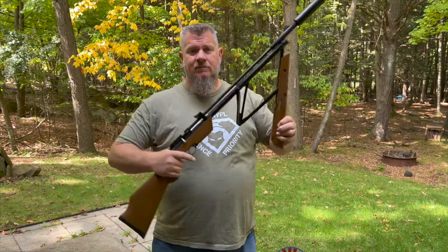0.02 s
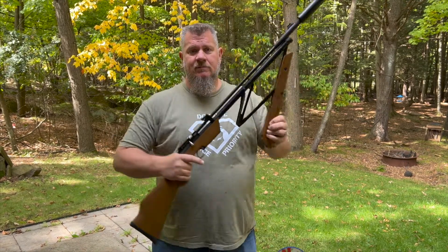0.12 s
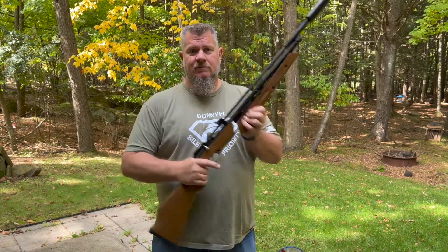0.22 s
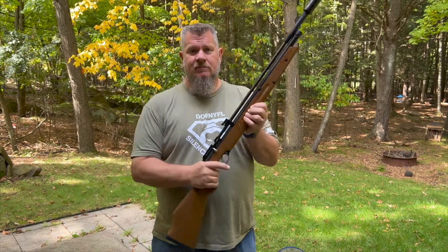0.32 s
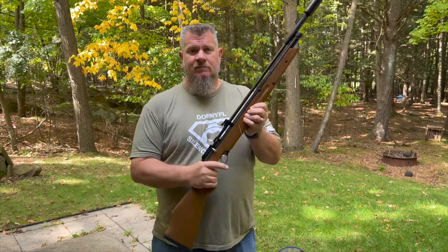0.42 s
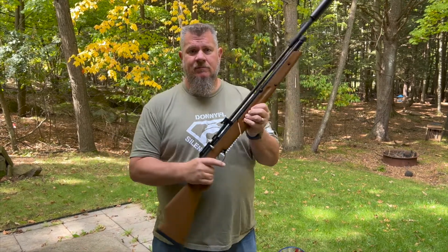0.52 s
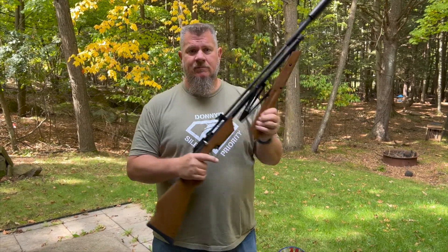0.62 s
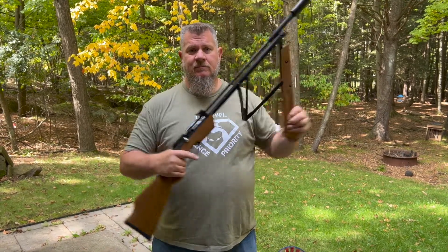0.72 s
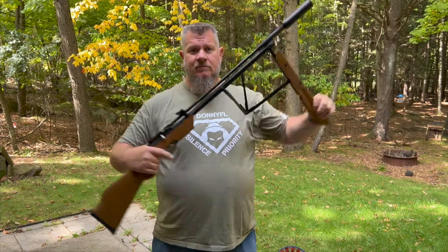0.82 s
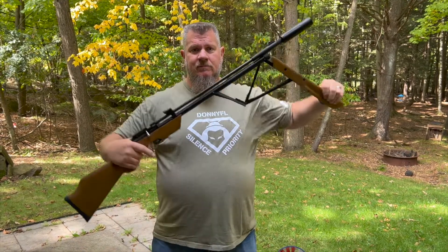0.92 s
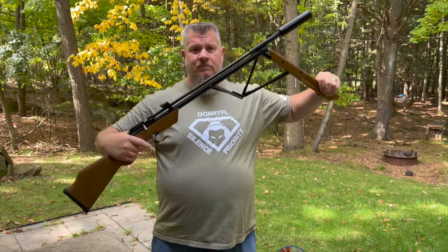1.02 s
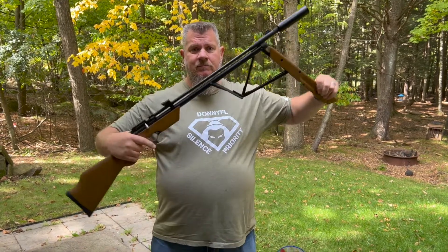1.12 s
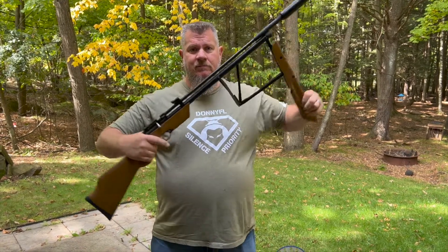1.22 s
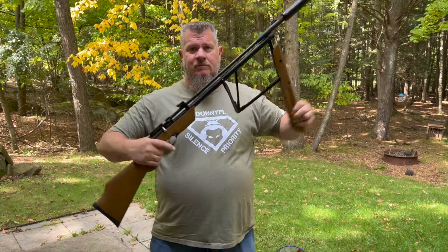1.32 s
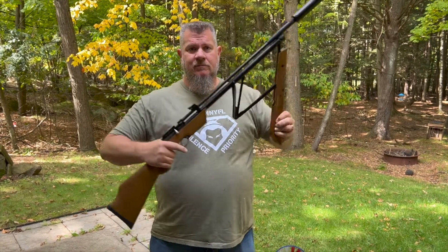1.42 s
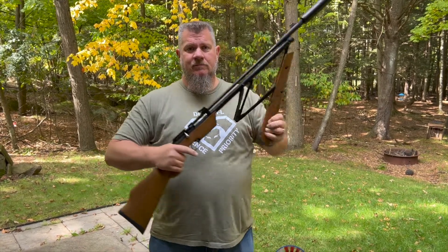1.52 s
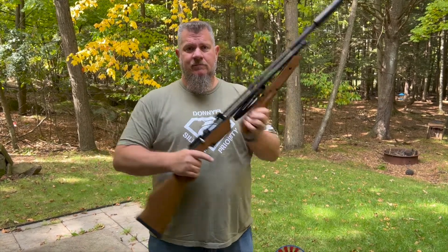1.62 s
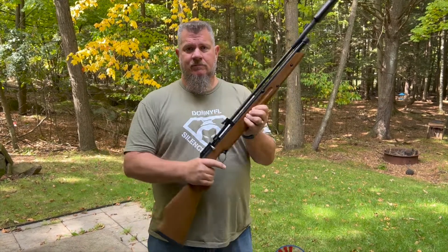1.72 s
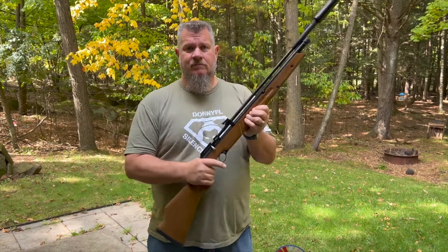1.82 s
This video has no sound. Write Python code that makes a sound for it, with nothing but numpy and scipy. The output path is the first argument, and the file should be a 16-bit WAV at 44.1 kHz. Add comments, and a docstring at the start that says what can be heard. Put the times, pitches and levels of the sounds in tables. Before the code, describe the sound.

An air rifle's pump lever snaps shut with a steel crack and wooden clap, clacks open in several metallic knocks, then slams shut again; short echoes from ground and trees, quiet outdoor air, loudest hits slightly overloading the microphone.

```python
"""In a garden at the edge of a wood, the pump lever of an air rifle is shut, swung open and shut again.
Shutting is a bright steel snap, then the wooden forearm claps home; opening makes the steel linkage clack.
Each blow is a short crack of fading noise plus ringing tones; clouds of tiny echoes from ground and trees follow.
Filtered noise makes the outdoor air, soft low handling thumps and pump hiss; a falling tone, a faint whistle.
The loudest blows overload the microphone."""
import sys
import numpy as np
from scipy import signal
from scipy.fft import rfft, irfft, next_fast_len
from scipy.io import wavfile

SR = 44100
rng = np.random.default_rng(int(sys.argv[2]) if len(sys.argv) > 2 else 0)


def store_wav(level_fs):
    """Save 16-bit WAV to argv[1]."""
    pcm = np.round(np.clip(np.atleast_2d(level_fs), -1, 1) * 32767)
    wavfile.write(sys.argv[1], SR, pcm.T.astype(np.int16))


N = 83790  # length in samples, 1.9 s

# phase lead of the left channel over the right: (pitch_hz, lead_radians)
LEFT_LEAD = [(100, -0.5), (700, 0.9), (2600, 0.42), (4800, 1), (5800, 2.5), (6700, -0.14), (8000, 1.5),
             (9100, -3.5), (10900, -2.5), (12200, -6), (14000, -5.5), (15800, -7)]
# how much of a crack or hiss differs between the channels: (pitch_hz, share from 0 to 1)
DIRECT_SPREAD = [(200, .15), (1500, .24), (4000, 0.44), (7500, 0.74), (10000, 0.21), (15000, .25)]
AIR_SPREAD = 0.33  # the same share, for the outdoor air, the thumps and the whistle


def undb(db):
    """Turn decibels into a plain loudness factor."""
    return 10 ** (np.asarray(db) / 20)


def unit(x):
    """Scale to an average (rms) level of 1."""
    return x / np.sqrt(np.mean(x ** 2))


def freqs(size):
    """List the frequencies of a spectrum in Hz, with zero raised to 1 so that logarithms work."""
    return np.maximum(np.fft.rfftfreq(size, 1 / SR), 1)


def along(points, hz):
    """Read a curve of (pitch_hz, value) points, joined by straight lines on a log-frequency axis."""
    p = np.array(points, float)
    return np.interp(np.log(hz), np.log(p[:, 0]), p[:, 1])


def stereo_noise(gain, spread, size):
    """Coloured noise in two channels: a shared part, shifted in phase, and a part that differs."""
    hz = freqs(size)
    share = np.clip(spread, 0, 1)
    shared, own = np.exp(2j * np.pi * rng.random((2, len(hz))))
    left = (shared + share * own) * np.exp(1j * along(LEFT_LEAD, hz))
    right = shared - share * own
    return unit(irfft(np.array([left, right]) * gain, size))


def garden():
    """Steady outdoor air is filtered noise; short swells of a narrow low band make handling thumps."""
    # colour of the outdoor air: (pitch_hz, level_db), only the shape counts
    air_colour = [(20, -23), (35, -7), (52, 3), (75, -2.5), (100, -4.5), (140, -13), (300, -17), (500, -22),
                  (800, -17.5), (1300, -25), (2500, -33.5), (5000, -50.5), (9000, -49.5), (15000, -52.5)]
    # soft low thumps of handling: (centre_s, width_s, level_db)
    thumps = [(.81, 0.016, -51), (1.048, 0.032, -39.5), (1.22, 0.019, -40.5), (1.75, 0.031, -49.5)]
    air_db, thump_hz, thump_width_hz = -45, 64.3, 22
    t, hz = np.arange(N) / SR, freqs(N)
    air = undb(air_db) * stereo_noise(undb(along(air_colour, hz)), AIR_SPREAD, N)
    swell = sum(undb(db) * np.exp(-((t - at) / width) ** 2) for at, width, db in thumps)
    low_noise = stereo_noise(np.exp(-((hz - thump_hz) / thump_width_hz) ** 2 / 2), AIR_SPREAD, N)
    return air + swell * low_noise


def hiss():
    """Air drawn and squeezed through the pump makes noise that swells and sinks."""
    # puffs of air: (centre_s, half_length_s, level_db)
    puffs = [(0.186, 0.059, -60), (1.362, 0.14, -60.5)]
    # colour of the hiss: (pitch_hz, level_db), only the shape counts
    hiss_colour = [(1000, -5), (3000, 4.5), (4500, -6.5), (7500, -9), (10000, -12.5), (14000, -12.5)]
    t, hz = np.arange(N) / SR, freqs(N)
    flow = sum(undb(db) * np.exp(-((t - at) / half) ** 2) for at, half, db in puffs)
    return flow * stereo_noise(undb(along(hiss_colour, hz)), along(DIRECT_SPREAD, hz), N)


def fade(x, t60, slope):
    """Let noise die away in octave bands, the treble sooner; t60 (time to fall 60 dB) holds at 2 kHz."""
    size = x.shape[1]
    t, spec = np.arange(size) / SR, rfft(x)
    centres = 125 * 2. ** np.arange(8)  # Hz
    out = 0
    for hz, pick in zip(centres, np.eye(len(centres))):
        share = np.interp(np.log(freqs(size)), np.log(centres), pick)
        band_t60 = t60 * (hz / 2000) ** -slope
        out = out + irfft(spec * share, size) * np.exp(-np.log(1000) * t / band_t60)
    return out


def strike_gain(hz, bright_db, contact_hz, body_db):
    """A blow tilts the brightness, lifts the resonance at the point of contact and sets the body level."""
    contact_db, contact_octaves = 5, 0.16
    body_top_hz = 1170  # the hollow body of the stock speaks below this
    tilt = bright_db * np.log2(np.maximum(hz, 500) / 2000)  # level below 500 Hz
    contact = contact_db * np.exp(-(np.log2(hz / contact_hz) / contact_octaves) ** 2)
    body = body_db / (1 + (hz / body_top_hz) ** 10)
    return undb(tilt + contact + body)


def blows(events, colour, modes, ring_db, size=12000):
    """Each blow is a crack of dense, quickly damped resonances plus the ring of the part's modes."""
    attack_s = 0.00054  # time constant of the onset
    decay_slope = 0.071  # higher bands die sooner, as Hz to this power
    ring_spread = 0.32  # size of the random phase offset in each channel, radians
    out = np.zeros((2, N + size))
    t, hz = np.arange(size) / SR, freqs(size)
    base = undb(along(colour, hz))
    for start, db, bright_db, t60, contact_hz, body_db in events:
        strike = (bright_db, contact_hz, body_db)
        crack = base * strike_gain(hz, *strike)
        norm = np.sqrt(np.sum(base ** 2) / np.sum(crack ** 2))
        hit = fade(stereo_noise(crack, along(DIRECT_SPREAD, hz), size), t60, decay_slope)
        # give cracks of the same decay time the same energy
        hit *= np.sqrt(t60 * SR / np.log(1000) / np.sum(hit ** 2))
        for f, mode_db, ring_s in modes:
            turn = rng.uniform(0, 2 * np.pi)
            apart = ring_spread * rng.standard_normal()
            phase = turn + np.array([[apart + along(LEFT_LEAD, f)], [-apart]])
            ring = np.sin(2 * np.pi * f * t + phase) * np.exp(-np.log(1000) * t / ring_s)
            hit += undb(ring_db + mode_db) * norm * strike_gain(f, *strike) * ring
        i = int(start * SR)
        out[:, i:i + size] += undb(db) * hit * (1 - np.exp(-t / attack_s))
    return out[:, :N]


def snaps():
    """The steel catch snaps over as the lever shuts: bright cracks and a short steel ring."""
    # blows: (start_s, level_db, brightness_db_per_octave, t60_s at 2 kHz, contact_hz, body_db)
    snap_blows = [(.2138, 3, 8, 0.013, 10700, -1), (.2165, -0.5, -2.5, 0.01, 1470, 2),
                  (1.6243, 3.5, 3.5, 0.014, 12200, -3), (1.6268, -6.5, -1, .02, 2090, -7),
                  (1.632, -17.5, 0, 0.0241, 2730, -7.5)]
    # colour of the crack: (pitch_hz, level_db), only the shape counts
    snap_colour = [(100, -32.5), (400, -25.5), (900, 2), (1400, 15), (2100, -10), (3000, -5), (4200, -0.5),
                   (8000, -3), (10700, -0.5), (13000, -15.5), (16000, -10)]
    # tones the catch rings with: (pitch_hz, level_db within the ring, t60_s)
    catch_modes = [(1428, -1.5, .035), (2090, 9, 0.02), (2835, 9.5, 0.02), (11070, -2.5, .014)]
    return blows(snap_blows, snap_colour, catch_modes, ring_db=-10.5)


def claps():
    """The wooden forearm claps against the pump tube and rings in its own modes."""
    # blows: (start_s, level_db, brightness_db_per_octave, t60_s at 2 kHz, contact_hz, body_db)
    clap_blows = [(.2245, -2.5, -5, 0.024, 980, 1), (.2278, 5, 0.5, 0.0097, 1320, 1),
                  (.2308, -1.5, 0, 0.011, 850, 1.5), (.2345, -13.5, 1, 0.019, 2700, -2),
                  (.4005, -26, 0.1, .025, 895, 6), (1.6362, 4, -2, 0.017, 1682, -5.5),
                  (1.642, -5.5, -5, 0.013, 1640, -4.5)]
    # colour of the crack: (pitch_hz, level_db), only the shape counts
    clap_colour = [(80, -45), (170, -4), (260, -31.5), (380, -22), (800, -1.5), (1100, -22), (1400, 2.5),
                   (1780, 9), (2200, -20), (3200, -17.5), (4200, -10), (7000, -11), (15000, -32.5)]
    # tones the forearm rings with: (pitch_hz, level_db within the ring, t60_s)
    forearm_modes = [(364, -19, 0.097), (501, -18, .09), (835, -15, 0.062), (1210, -32.5, .12),
                     (1406, -9.5, .07), (1613, -10.5, 0.086), (1785, 0, 0.076), (1910, 1.5, 0.051),
                     (2630, -22, 0.15), (3225, -11, 0.074), (6650, -12, 0.047), (1765, -30.5, 0.49),
                     (1665, -28, .3)]
    return blows(clap_blows, clap_colour, forearm_modes, ring_db=-10)


def clacks():
    """The steel linkage knocks in its pivots and rings in its own modes."""
    # blows: (start_s, level_db, brightness_db_per_octave, t60_s at 2 kHz, contact_hz, body_db)
    clack_blows = [(.455, -44.5, 6, 0.027, 1900, 2.5), (.568, -27, -1.8, 0.034, 1870, -6),
                   (.588, -17.5, 0.5, 0.037, 4500, -0.5), (.5925, -25, -2, 0.1, 800, 0),
                   (.6158, -2, 3, 0.035, 6100, 0), (.6195, 0, -1.5, 0.024, 2174, -0.5),
                   (.776, -28.5, 10, 0.041, 7420, -1.5), (.7802, -20, 1.5, 0.037, 6820, -5),
                   (.7828, -18.5, -2, 0.051, 2240, 2.5), (.7895, -21, 0.5, 0.032, 1385, 0),
                   (.907, 3.5, 2.35, 0.016, 3980, -5.5), (.9128, -4.5, 0.5, 0.022, 3800, -8),
                   (.9158, 0.5, -6, 0.012, 1904, -5.5), (1.070, -31, -1, 0.027, 1480, 1.5),
                   (1.0825, -26.5, -0.5, 0.045, 3900, 2), (1.0893, -30.5, -11.5, .025, 1000, 8)]
    # colour of the crack: (pitch_hz, level_db), only the shape counts
    clack_colour = [(80, -33), (190, -18.5), (300, -18), (650, -9.5), (950, -12.5), (1500, 1.5), (2300, -6),
                    (3100, -11), (5000, -14), (7000, -8.5), (9500, -11.5), (15000, -18)]
    # tones the linkage rings with: (pitch_hz, level_db within the ring, t60_s)
    link_modes = [(633, -17, 0.079), (1123, -11.5, 0.1), (1510, -4, 0.017), (2036, -5.5, 0.034),
                  (2212, 1.5, 0.062), (2580, -6.5, 0.04), (3947, -3, 0.017), (6180, -15.5, .09),
                  (6950, -14.5, .07), (7360, -7.5, .06)]
    return blows(clack_blows, clack_colour, link_modes, ring_db=-12.5)


def linger(power, rise_s, t60):
    """Spread sound energy over time: it builds up, then dies away."""
    for pole in np.exp(-1 / (rise_s * SR)), np.exp(-2 * np.log(1000) / (t60 * SR)):
        power = signal.lfilter([1 - pole], [1, -pole], power)
    return power


def scatter(x, count=20):
    """Band by band, blow energy returns as a cloud of tiny echoes: soon from the ground, later from trees."""
    # colour of the echoes from the ground, then from the trees: (pitch_hz, level_db)
    near_colour = [(150, 2), (500, 1.5), (1700, -5.5), (4000, 5), (7000, 0.5), (14000, -12)]
    far_colour = [(150, -11), (500, -3.5), (1700, -2), (4000, 3.5), (7000, 1), (10000, -9.5), (14000, -5)]
    # how much of the echoes differs between the channels: (pitch_hz, share from 0 to 1)
    echo_spread = [(200, .12), (700, 0.39), (1500, 1), (8000, .8), (9800, .12), (14000, 0.23)]
    # balance of the echoes: (pitch_hz, left_minus_right_db)
    echo_balance = [(600, -3), (3000, 0.9), (4200, 2.5), (5500, 10), (7200, 1), (9000, 0.5)]
    near_db, near_t60_s, near_rise_s = -11.5, 0.16, 0.0058
    far_db, far_t60_s, far_rise_s = -21, 0.72, 0.027  # t60 at 2 kHz
    far_damp = 0.15  # far treble dies sooner, as Hz to this power
    size = next_fast_len(N, real=True)
    hz, spec, out = freqs(size), rfft(x, size), 0
    centres = np.geomspace(150, 15000, count)  # Hz
    cloud = rfft(stereo_noise(1, along(echo_spread, hz), size))
    for f, pick in zip(centres, np.eye(count)):
        band = np.interp(hz, centres, pick) * (hz > centres[0] / 2)
        power = np.mean(irfft(spec * np.sqrt(band), size)[:, :N] ** 2, axis=0)
        near = undb(near_db + along(near_colour, f)) ** 2 * linger(power, near_rise_s, near_t60_s)
        far_t60 = far_t60_s * (f / 2000) ** -far_damp
        far = undb(far_db + along(far_colour, f)) ** 2 * linger(power, far_rise_s, far_t60)
        sides = undb(along(echo_balance, f) * np.array([[1], [-1]]) / 2)
        echoes = unit(sides * irfft(cloud * band, size)[:, :N])
        out = out + np.sqrt(near + far) * echoes
    return out


def whistle():
    """Air squeezed in the closing stroke whistles faintly: a falling tone whose strength wavers at random."""
    centre_s, half_length_s = 1.455, 0.039
    centre_hz, fall_hz_per_s = 4700, 8300
    gain_db, waver_hz = -68, 150  # waver_hz: how fast the strength wavers
    t = np.arange(N) / SR - centre_s
    waver = stereo_noise(np.exp(-(freqs(N) / waver_hz) ** 2), AIR_SPREAD, N)
    tone = np.sin(2 * np.pi * np.cumsum(centre_hz - fall_hz_per_s * t) / SR)
    return undb(gain_db) * waver * tone * np.exp(-(t / half_length_s) ** 2)


def scene():
    """Add up the rifle's blows, their echoes, the air in the pump and the garden."""
    gun = snaps() + claps() + clacks()
    return garden() + hiss() + gun + scatter(gun) + whistle()


def record(dry):
    """The microphone flattens the loudest peaks and the top is cut."""
    overload, top_hz = 1.0, 15800  # overload: the level that peaks cannot pass before the cut
    held = dry / (1 + (dry / overload) ** 6) ** (1 / 6)
    return signal.sosfilt(signal.ellip(10, .2, 70, top_hz, fs=SR, output="sos"), held)


dry = scene()
out = record(dry)
store_wav(out)
```